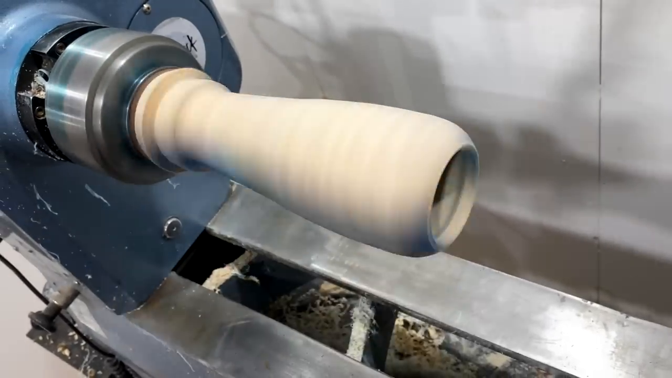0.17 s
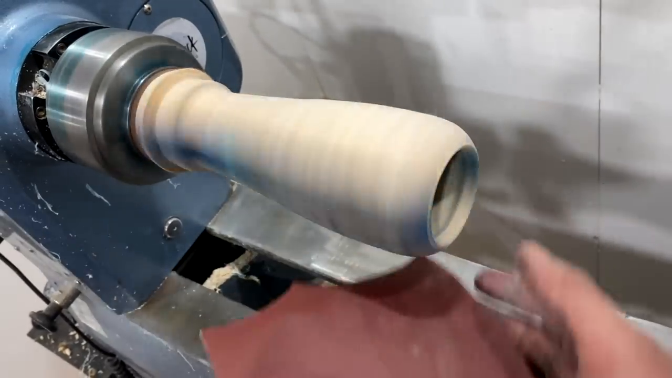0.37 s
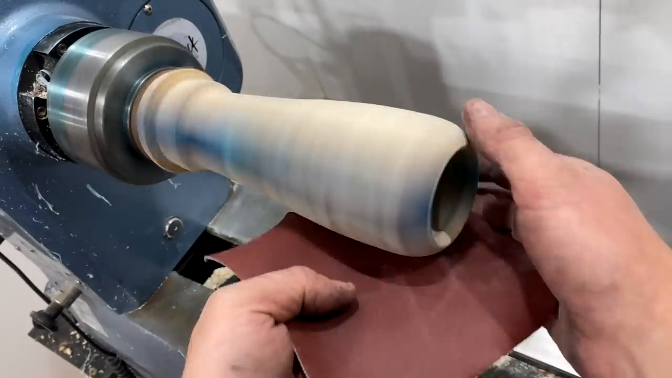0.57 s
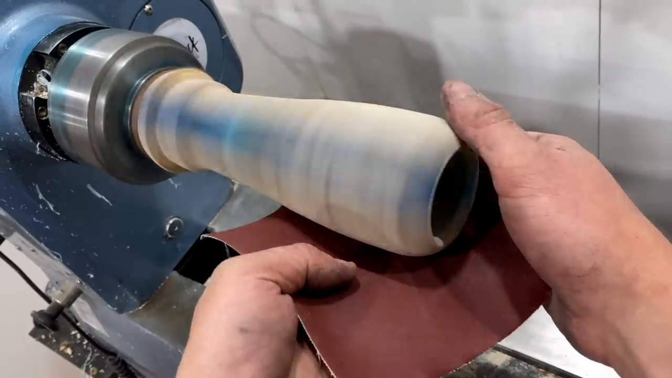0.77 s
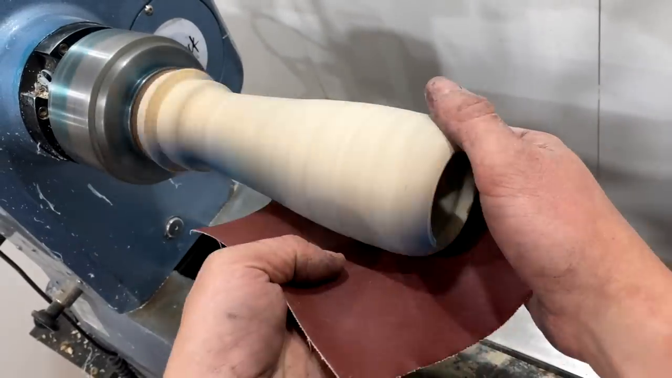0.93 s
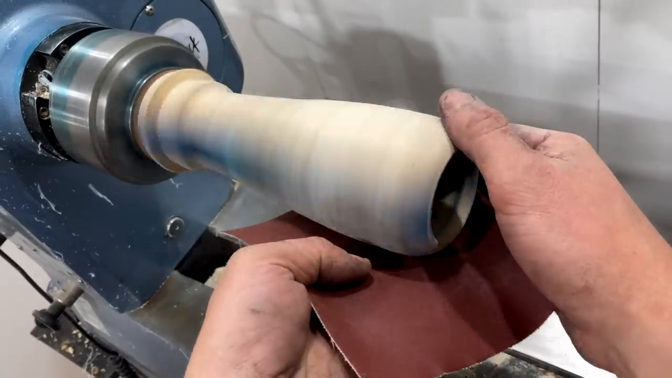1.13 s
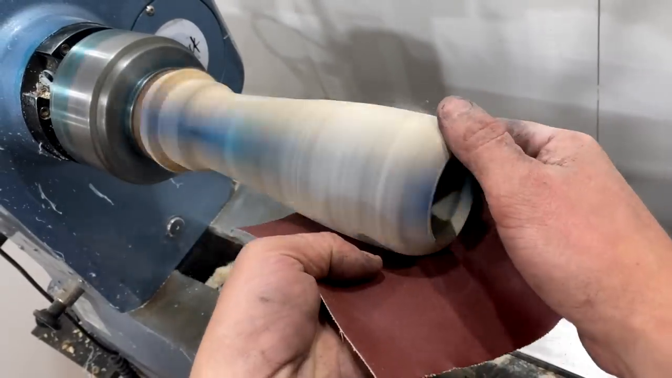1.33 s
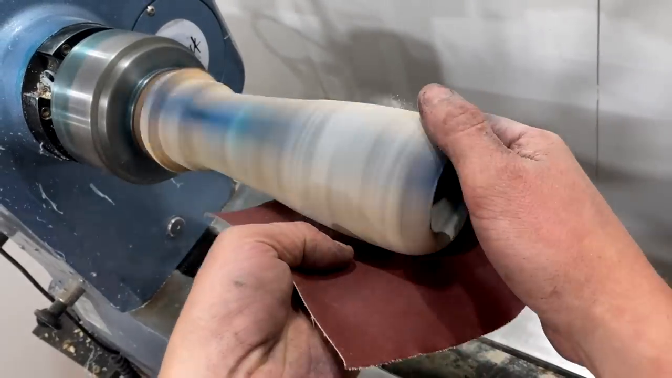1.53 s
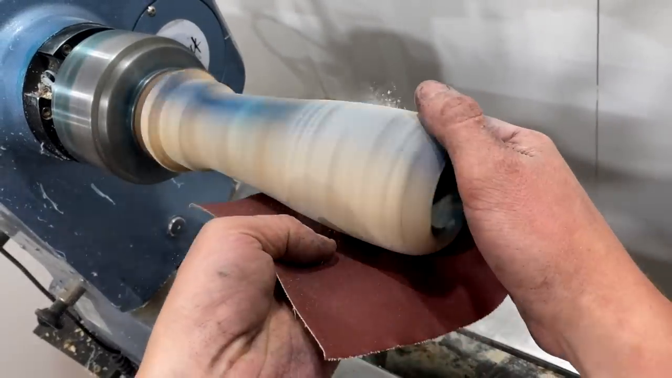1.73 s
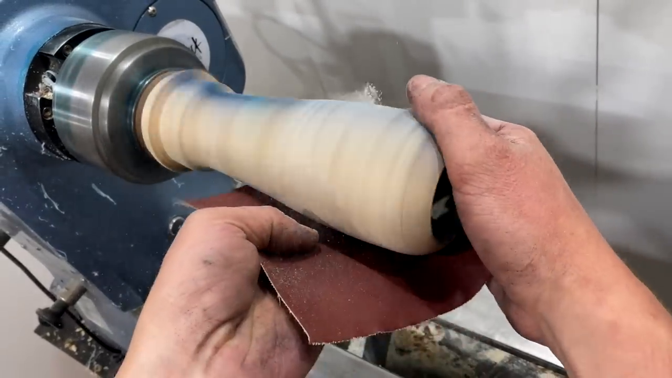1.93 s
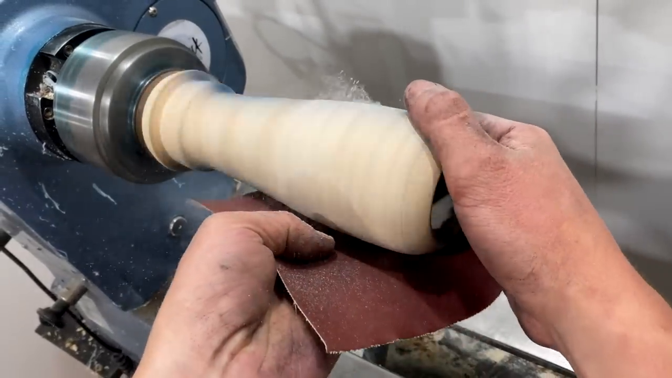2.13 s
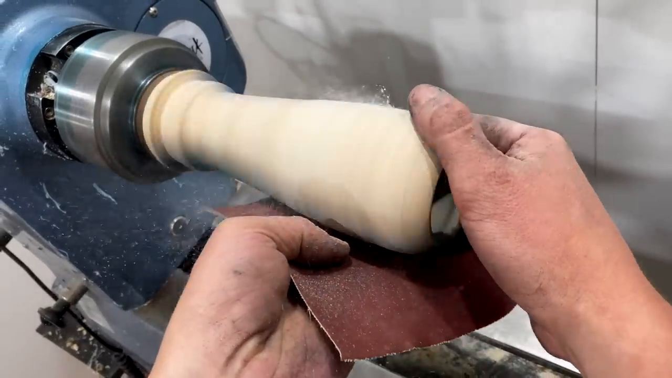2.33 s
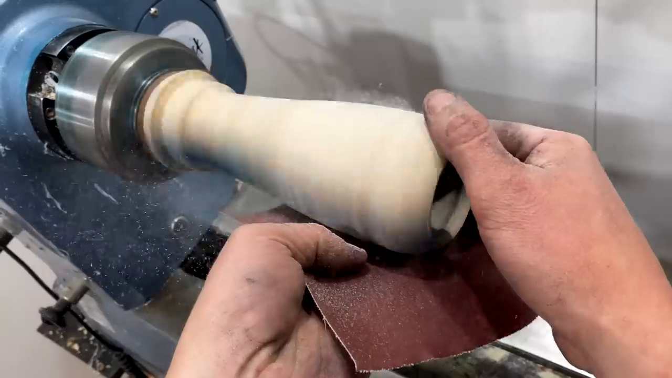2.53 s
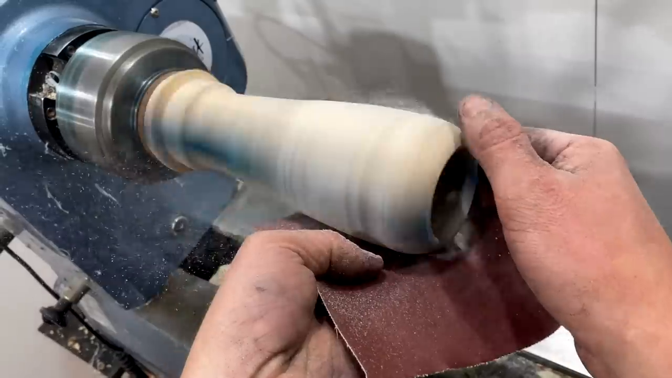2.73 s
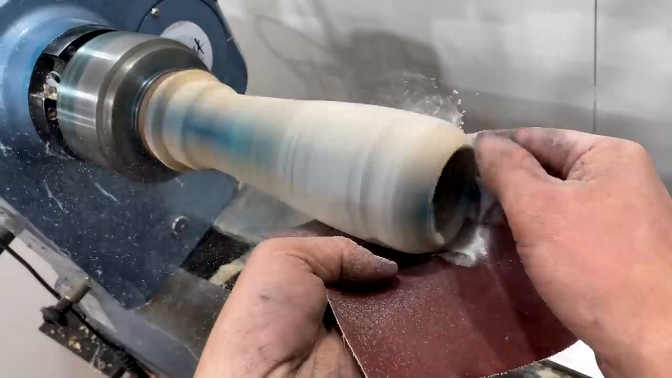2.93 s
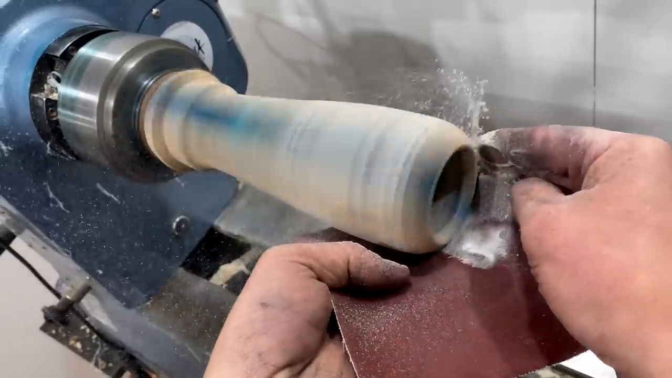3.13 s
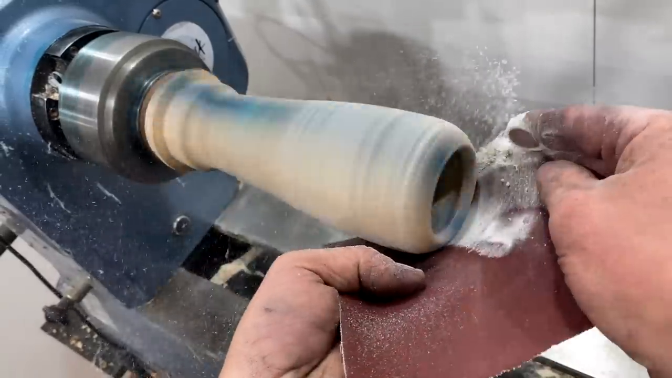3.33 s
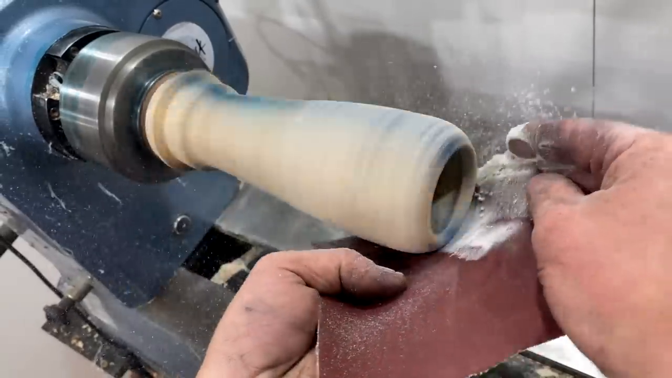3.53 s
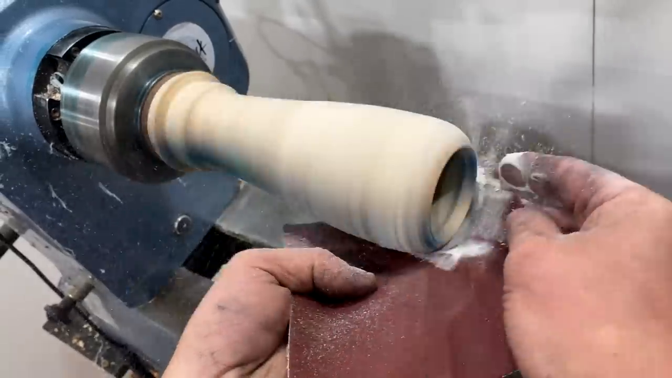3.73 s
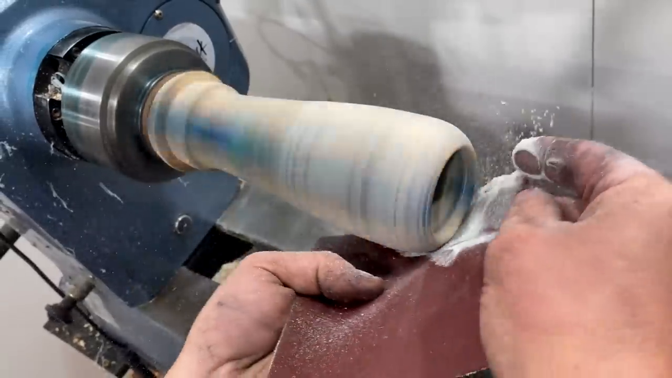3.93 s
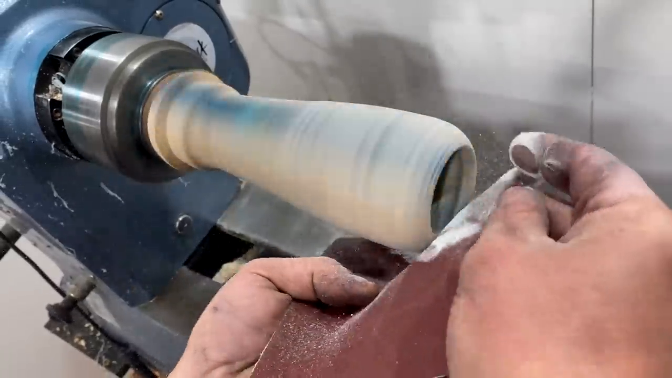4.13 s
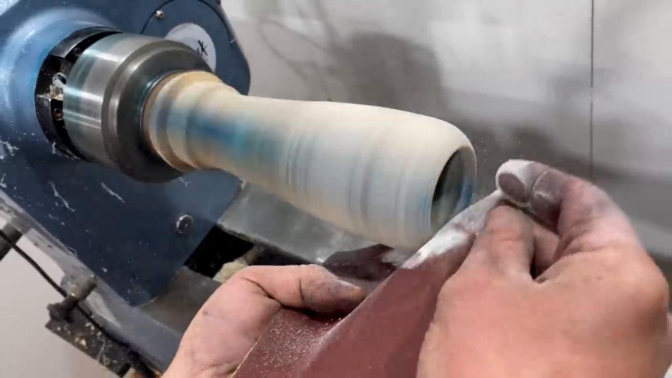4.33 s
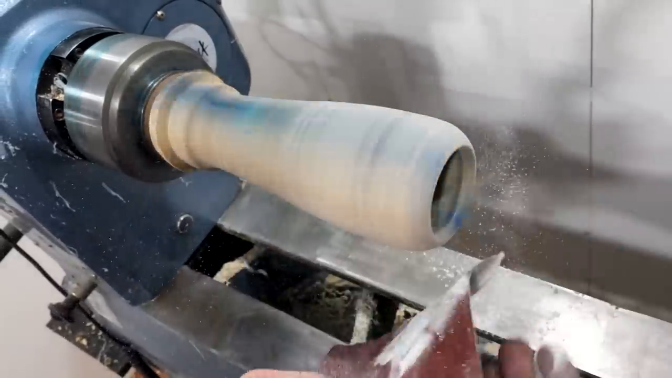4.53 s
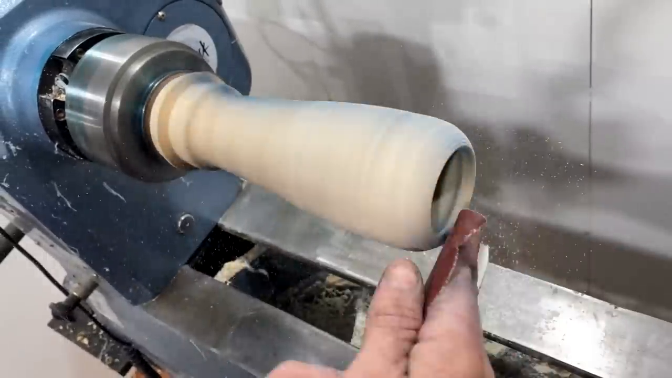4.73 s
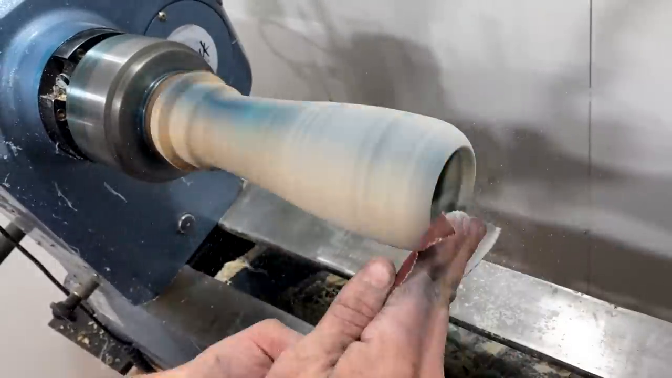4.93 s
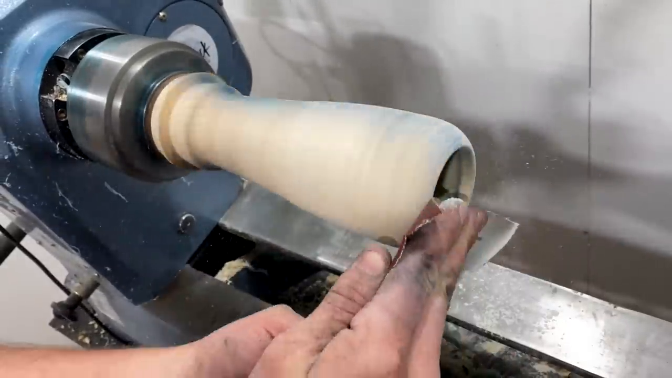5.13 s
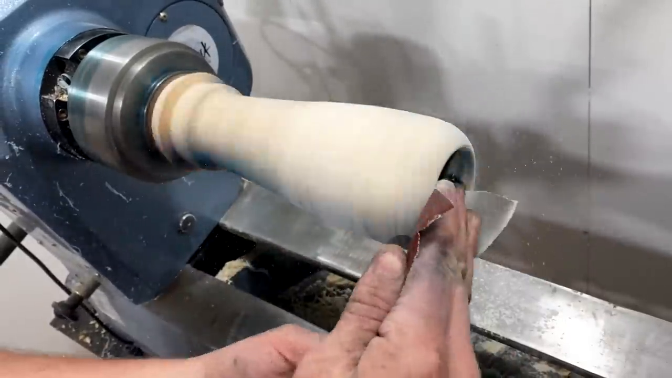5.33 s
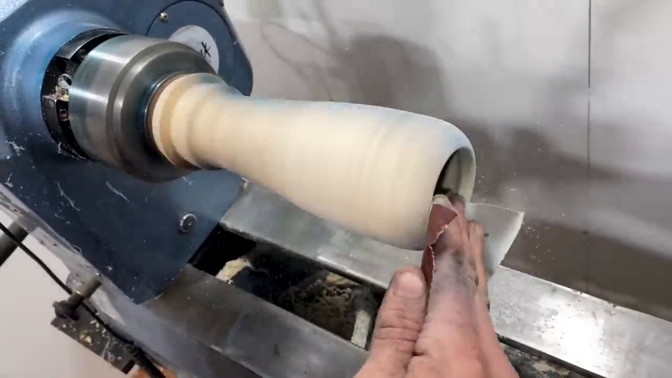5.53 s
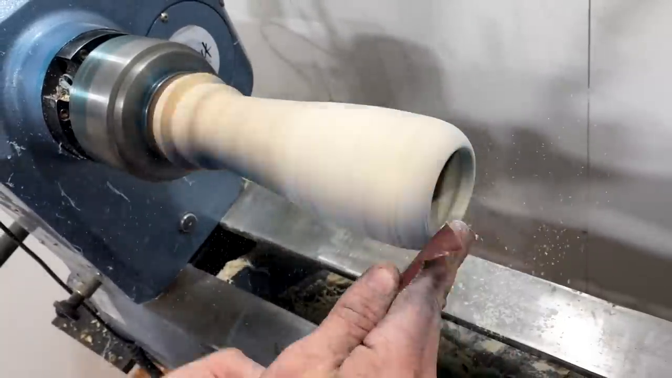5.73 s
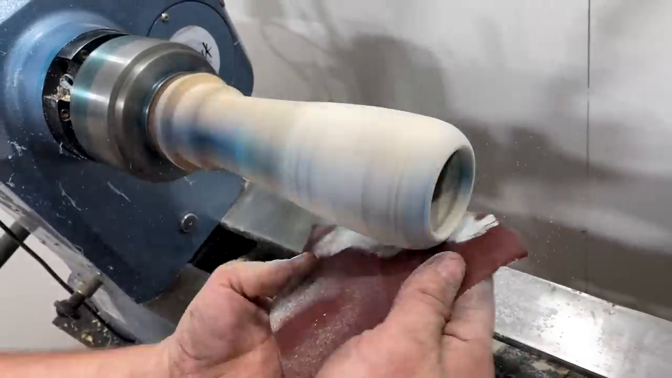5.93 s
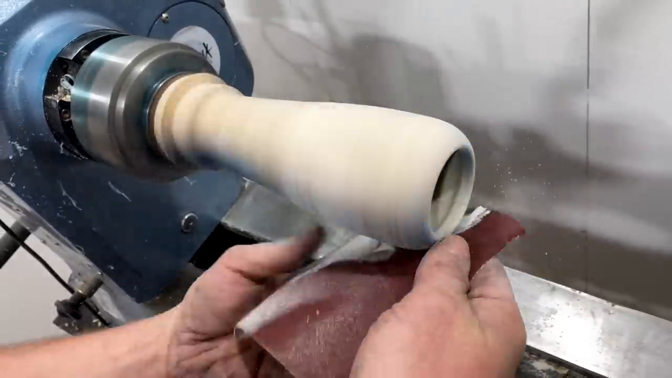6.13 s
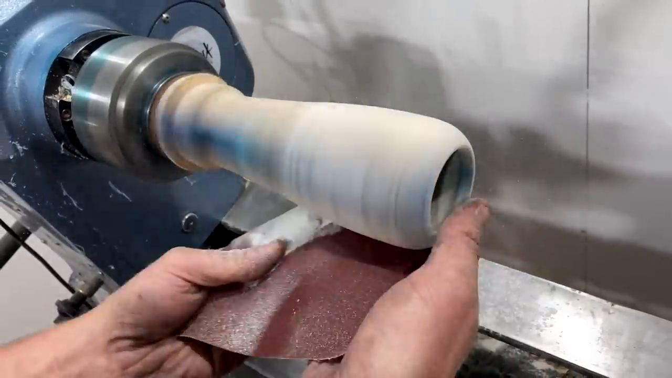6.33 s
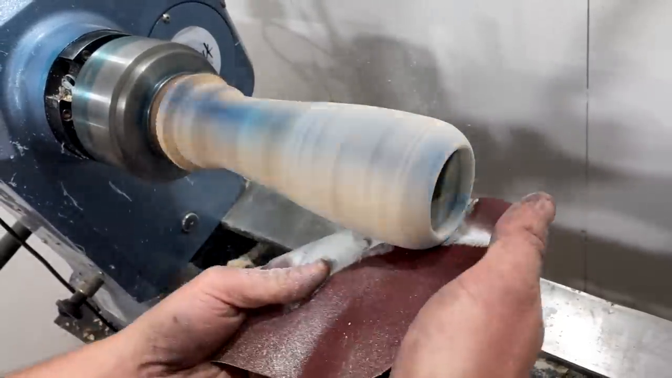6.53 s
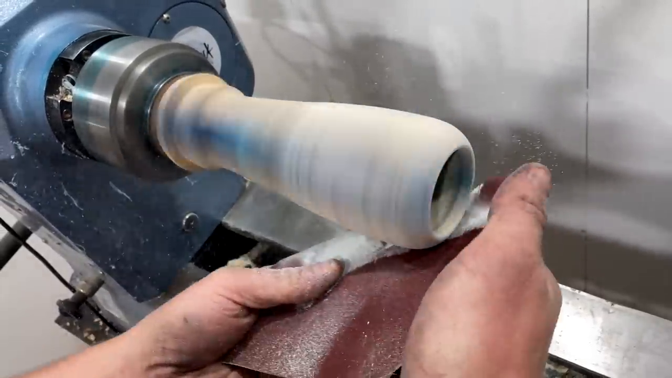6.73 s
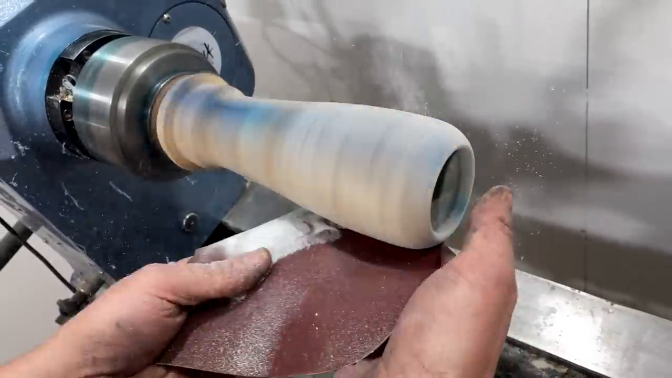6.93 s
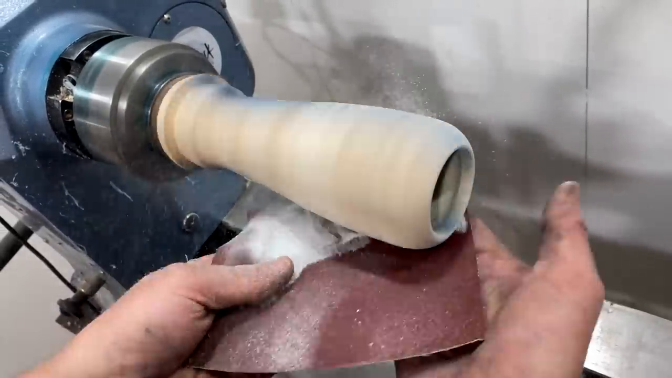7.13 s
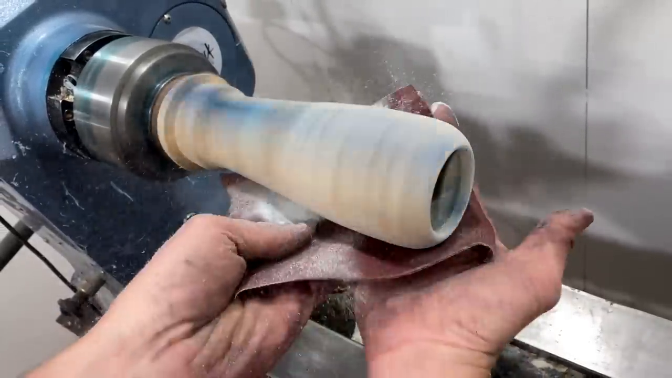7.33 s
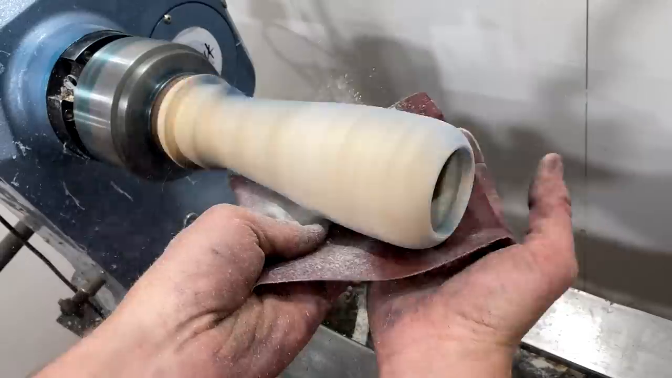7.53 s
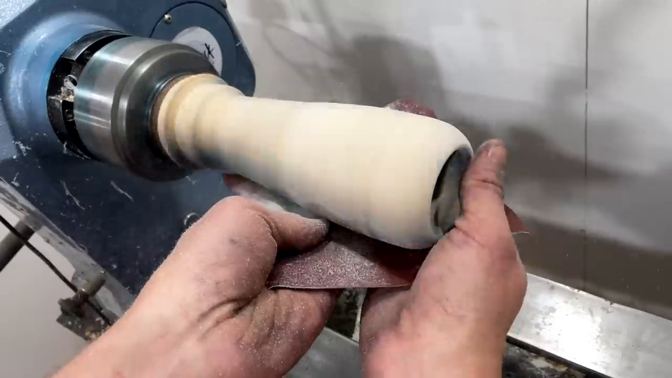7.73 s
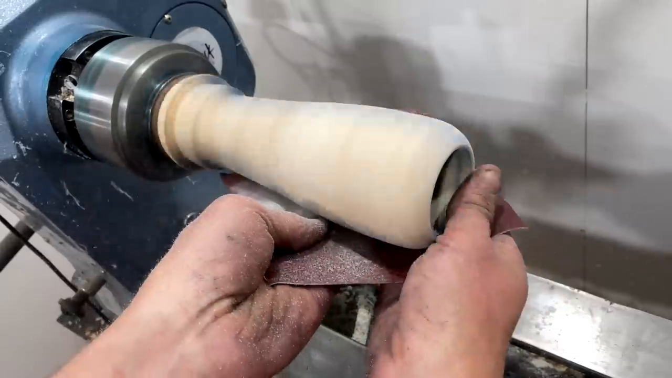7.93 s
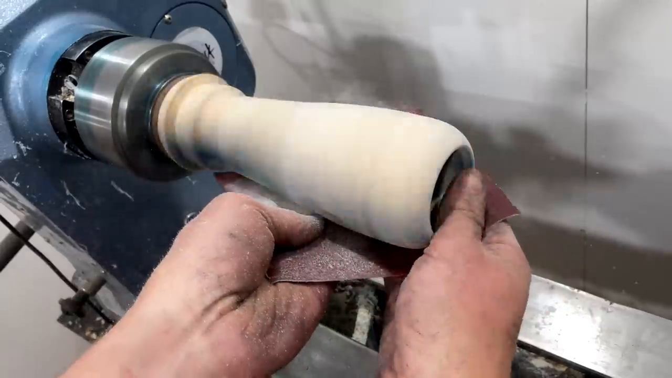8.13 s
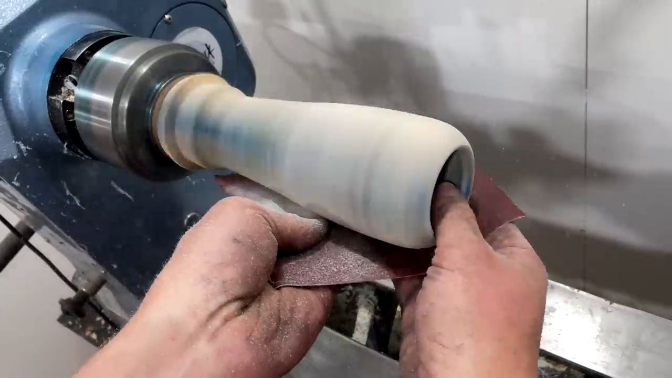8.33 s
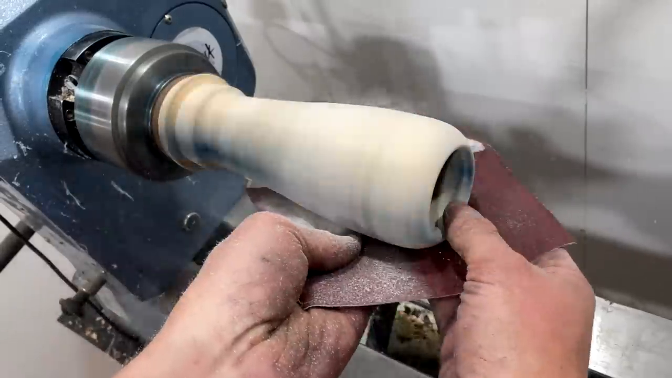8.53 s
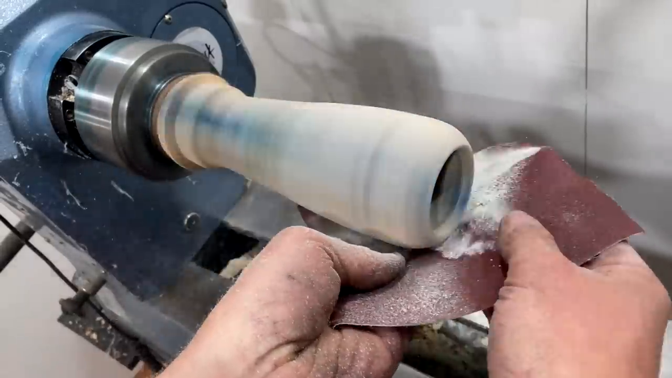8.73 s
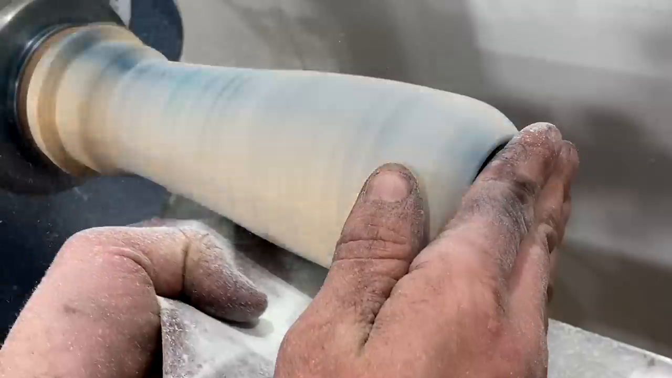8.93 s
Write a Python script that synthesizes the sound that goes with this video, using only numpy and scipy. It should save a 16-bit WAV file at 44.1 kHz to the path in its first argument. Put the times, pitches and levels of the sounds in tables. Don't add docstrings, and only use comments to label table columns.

```python
import sys
import numpy as np
from scipy import signal
from scipy.io import wavfile
from scipy.ndimage import uniform_filter1d

SR = 44100
rng = np.random.default_rng(int(sys.argv[2]) if len(sys.argv) > 2 else 0)


def how_loud(loudness_db):
    steps = np.asarray(loudness_db, float) / 20
    return 10 ** steps


def output_pcm(signal):
    pcm = np.clip(np.atleast_2d(signal).T, -1, 1) * 32767
    wavfile.write(sys.argv[1], SR, np.round(pcm).astype(np.int16))


N = 395577
TURNS_PER_S = 19.69
STEP = 32


def evened(x):
    return x / np.sqrt(np.mean(x ** 2) + 1e-20)


def read(points, hz):
    f, value = np.transpose(points)
    return np.interp(np.log(hz + 1), np.log(f + 1), value)


def follow(rows, t):
    s, *columns = np.transpose(rows)
    return [np.interp(t, s, c) for c in columns]


def at_samples(t, values):
    return np.interp(np.arange(N) / SR, t, values)


def drift(per_s):
    size = max(int(SR / STEP / per_s), 1)
    chance = rng.standard_normal(N // STEP + 2)
    return evened(uniform_filter1d(uniform_filter1d(chance, size), size))


def wander(per_s):
    coarse = drift(per_s)
    return np.interp(np.arange(N) / STEP, np.arange(len(coarse)), coarse)


def wander_at(t, *parts):
    return np.interp(t * SR, np.arange(N), sum(strength * wander(per_s) for strength, per_s in parts))


def short_time_axes(size):
    return np.fft.rfftfreq(size, 1 / SR), np.arange(4 * N // size + 5) * size / 4 / SR


def patches(t, hz, frames, bins):
    chance = rng.standard_normal((len(t), len(hz)))
    return evened(uniform_filter1d(uniform_filter1d(chance, frames, 0), bins, 1))


def ports(field_db, same, left_db=0, lead=0):
    a, b, c, d = np.moveaxis(rng.standard_normal(field_db.shape + (4,)), -1, 0)
    same = np.clip(same, -1, 1)
    left = a + 1j * b
    mixed = same * left + np.sqrt(1 - same ** 2) * (c + 1j * d)
    right = mixed * np.exp(-1j * lead) * how_loud(-left_db)
    z = np.array([left, right]) * how_loud(field_db)
    size = 2 * (field_db.shape[1] - 1)
    return signal.istft(z, nperseg=size, noverlap=3 * size // 4, time_axis=1, freq_axis=2)[1][:, :N]


def tone(hz, wander_hz, flutter_db, lead=0.47, per_s=26, crest_s=None):
    pitch = hz + np.repeat(wander_hz * drift(per_s), STEP)[:N]
    cycles = np.cumsum(pitch) / SR + rng.random()
    if crest_s is not None:
        cycles = cycles - cycles[round(crest_s * SR)]
    turn = (2 * np.pi * (cycles - np.floor(cycles))).astype(np.float32)
    strength = np.sqrt(2) * np.repeat(how_loud(flutter_db * drift(per_s)), STEP)[:N]
    return strength * np.array([np.cos(turn), np.cos(turn + np.float32(lead))])


# (time [s], openness [dB], inverter top tone [dB], bed drone [dB])
EXPOSURE = [(0, 5.5, -56.5, -37.5), (.2, 5, -54, -32.5), (.45, 6.5, -64, -30.5), (.7, 0.5, -66, -44.5),
            (1.25, -3, -74, -42), (2, -1, -59.5, -46), (3.1, -6, -65, -49.5), (3.6, -7, -68, -52.5),
            (4.2, -0.5, -58, -47), (4.6, -2.5, -49, -34.5), (4.85, 2, -52, -39.5), (5.3, 5, -51, -45),
            (6.0, 4, -53, -41), (6.7, 5, -50, -42.5), (7.15, 4.5, -65, -38), (7.6, 3, -55, -39),
            (8.3, -0.5, -68, -42.5), (8.97, -2, -58, -63)]


def machine(t):
    return follow(EXPOSURE, t)


# (frequency [Hz], density [dB per Hz])
WASH = [(260, -46), (450, -2), (690, -11), (900, -6.5), (1600, -10.5), (2180, -12.5), (2300, -5.5),
        (2420, -14.5), (6000, -25.5), (9000, -17), (9600, -17), (10100, -9), (10800, -20), (11100, -38),
        (15700, -42)]


def shop():
    hz, t = short_time_axes(1024)
    texture_db = 1.5 * patches(t, hz, 14, 10)
    level_db = 0.58 * machine(t)[0] + 1.1
    shade_db = 0.51 * np.minimum(cupping(hz, t), 0)
    same = read([(500, 0.1), (1000, 0.56), (6000, 0.5), (8000, 0.77)], hz)
    low_lead = read([(400, 0.18), (800, 4.2), (1500, 1.05)], hz)
    lead = np.where(hz < 1500, low_lead, read(GRIT_LEAD, hz))
    field_db = read(WASH, hz) + shade_db + texture_db + level_db[:, None]
    return how_loud(-49.5) * evened(ports(field_db, same, 0, lead))


# (time [s], motor hum [dB], sixth shaft order [dB], other orders [dB], shake wobble [Hz])
STRAIN = [(0, -58, -45.5, -8, 0.18), (.5, -52, -53.5, -8, .2), (1.0, -47, -56, -3, .2),
          (1.9, -48.5, -58, 2, .2), (2.2, -52, -46, 5, .2), (2.7, -52, -44, -4, .2), (3.5, -52, -47, 3, .2),
          (3.8, -48, -62, -8, .2), (4.3, -45, -60, -8, .2), (4.7, -49, -54, -8, .2),
          (5.2, -44, -62, -8, .2), (5.9, -47, -51, -7, 0.19), (6.3, -43.5, -54, -4, 4.1),
          (7.0, -45.5, -57, -5, 4), (7.5, -44, -65, -5, 2.8), (7.8, -43.5, -63, -5, 0.29),
          (8.4, -46, -65, -9, 0.31), (8.97, -47.5, -61, -6, 2.2)]


def spindle(t):
    return follow(STRAIN, t)


# (frequency [Hz], density [dB per Hz])
BED_NOISE = [(15, -52), (25, -19), (50, -14), (90, -10), (140, -9), (190, -5), (250, 0), (300, -8.5),
             (340, -15), (500, -23.5), (575, -24.5), (640, -51), (760, -62), (1500, -90)]
# (multiple of the turn [1], level over rumble [dB])
SHAFT_ORDERS = [(5, -19), (10, -12.5), (13, -10)]
# (time [s], frequency [Hz], level over rumble [dB])
HEADSTOCK_NOTE = [(0, 274, -24), (.9, 275.5, -6), (1.75, 274.6, -2.5), (2.02, 273.2, -6), (2.3, 273.8, -5),
                  (3.35, 274, 0.5), (3.6, 280, -9), (4.4, 285, -9), (5.6, 282.9, -9.5), (6.3, 279.8, -11.5),
                  (7.45, 286.5, -6), (8.97, 282.5, -7)]


def bed_rumble():
    now = np.arange(N) / SR
    open_db = machine(now)[0]
    hz, t = short_time_axes(4096)
    loaded_db = np.outer(0.5 * (hand(t)[5] + 50), read([(60, 0.72), (80, 0.6), (105, 0.16)], hz))
    bed = how_loud(1.5) * evened(ports(read(BED_NOISE, hz) + loaded_db, 0.97, -0.3))
    orders = sum(how_loud(db) * tone(k * TURNS_PER_S, 0.37, 0.92) for k, db in SHAFT_ORDERS)
    bed += how_loud(spindle(now)[2]) * orders
    head_hz, head_db = follow(HEADSTOCK_NOTE, now)
    bed += how_loud(head_db) * tone(head_hz, 2.2, 1.95, per_s=13)
    bed += how_loud(-26 + 0.85 * open_db) * tone(29 * TURNS_PER_S, 5.94, 2.7)
    return how_loud(-44 + 0.51 * open_db) * bed


def load_levels():
    t = short_time_axes(1024)[1]
    return [at_samples(t, db) for db in uniform_filter1d(hand(t)[5:], size=14)]


# (multiple of the turn [1], level over chatter [dB])
CHATTER_ORDERS = [(17, -11.5), (18, -4.5), (19, -7.5), (20, -8), (21, -2), (27, -26)]
# (time [s], level [dB])
GRIT_BITE = [(.68, -16), (.8, 2), (1.3, -4.5), (1.7, -8.5), (1.95, 1), (2.1, -5), (2.3, 0.5), (2.95, -3.5),
             (3.15, -6.5), (6, -16), (7, -16), (8.97, -17)]


def chatter(level_db):
    lines = sum(how_loud(db) * tone(k * TURNS_PER_S, 1.19, 3.8, per_s=7.9) for k, db in CHATTER_ORDERS)
    bite_db = follow(GRIT_BITE, np.arange(N) / SR)[0]
    return how_loud(level_db) * how_loud(bite_db) * lines


def shake(level_db):
    wobble_hz = spindle(np.arange(N) / SR)[3]
    strength = how_loud(level_db - 1.7 + 0.73 * wander(4.6))
    return strength * tone(4 * TURNS_PER_S + wobble_hz * wander(5.1), 0.26, 1.4, per_s=8.6)


# (time [s], level over rest [dB])
SWELLS = [(1.22, 2), (3.42, 10), (3.72, 4), (4.29, 5.5), (4.55, -7), (4.86, 3), (5.27, 10), (5.6, 9),
          (6.2, 0.5), (6.64, 6), (6.85, 5.5), (7.12, 5), (7.42, 4), (8.77, 15)]


def drone():
    t = short_time_axes(1024)[1]
    swell_db = at_samples(t, sum(db * np.exp(-((t - s) / 0.1) ** 2) for s, db in SWELLS))
    drone_db = machine(np.arange(N) / SR)[2]
    return how_loud(drone_db - 3.0 + swell_db) * tone(11 * TURNS_PER_S, 0.63, 0.81)


def motor_hum():
    hum_db, sixth_db = spindle(np.arange(N) / SR)[:2]
    beat_s = 3.42
    hum = how_loud(hum_db) * tone(114.05, 0.31, 1.2, per_s=15.5, crest_s=beat_s)
    sixth = how_loud(sixth_db) * tone(6 * TURNS_PER_S - .08, 0.31, 1.1, per_s=15, crest_s=beat_s)
    return hum + sixth


def lathe():
    shake_db, chatter_db = load_levels()
    return bed_rumble() + chatter(chatter_db) + shake(shake_db) + drone() + motor_hum()


# (time [s], frequency [Hz])
SLOT_HZ = [
    [(4.9, 840), (4.93, 828), (5.3, 832), (5.65, 839)],
    [(3.8, 866), (3.9, 862), (5.0, 866), (5.5, 877), (6.2, 885), (6.9, 888)],
]
# (time [s], level [dB])
SLOT_DB = [
    [(.35, -51), (.55, -64), (3.1, -58.5), (3.4, -72), (4.9, -70), (5.1, -59), (5.9, -51), (7.3, -56.5),
     (7.55, -66)],
    [(0, -65), (.3, -54), (.7, -64), (3.7, -73), (4.0, -59), (4.6, -55.5), (5.0, -62), (5.45, -59),
     (5.7, -67), (6.7, -56), (7.1, -66)],
]
# (frequency [Hz], level over cluster [dB], later change [dB], phase between ports [rad])
CLUSTER = [(9281, -6, -6, 2.0), (9760, -18, 6, 2.0), (9857, -3, -12, 2.0), (9954, 3, -3, 1.5),
           (10142, -7, 3, 1.0), (10239, -16, 0, 1.0), (10524, -15, 0, .5), (10815, -11, -8, 0),
           (10912, -12, -8, 0), (11380, -20, -4, 0)]
# (start [s], end [s])
REBALANCE = (1, 4)


def whine():
    t = np.arange(N) / SR
    open_db, top_db, _ = machine(t)
    slots = cluster = 0
    for pitch, level in zip(SLOT_HZ, SLOT_DB):
        slots = slots + how_loud(follow(level, t)[0]) * tone(follow(pitch, t)[0], 1.17, 0.82, 1.98)
    for f, db, change_db, lead in CLUSTER:
        strength = np.interp(t, REBALANCE, how_loud(np.array([db, db + change_db])))
        cluster = cluster + strength * tone(f, 2.5, 2.0, lead)
    top = how_loud(top_db) * tone(10719, 3.1, 0.9, 0)
    return slots + how_loud(-54 + 0.47 * open_db) * cluster + top


# (frequency [Hz], wander [Hz], level running free [dB], change with the sheet on the wood [dB])
BEARING_LINE = (2312, 3.5, -56, -8)


def bearing():
    hz, wander_hz, db, loaded_db = BEARING_LINE
    t = short_time_axes(1024)[1]
    touching = uniform_filter1d(1. * (hand(t - .15)[0] > -50), size=24)
    warming_db = -1 * t
    level_db = db + warming_db + loaded_db * touching + 0.47 * machine(t)[0]
    return how_loud(at_samples(t, level_db)) * tone(hz, wander_hz, 0.94, 1.74)


# (start [s], length [s], start frequency [Hz], end frequency [Hz])
EDGE_SONG = (5.27, .32, 415, 440)


def squeak():
    s, length, from_hz, to_hz = EDGE_SONG
    u = np.clip((np.arange(N) / SR - s) / length, 0, 1)
    pitch = from_hz + (to_hz - from_hz) * np.minimum(u / .4, 1)
    return how_loud(-53.5) * np.sin(np.pi * u) * tone(pitch, 4.2, 2.5)


# (time [s], peak level [dB], frequency [Hz])
SCUFFS = [(0.473, -30, 417), (0.54, -37, 900), (0.655, -32.5, 450), (4.12, -48, 409), (4.759, -34, 698),
          (5.328, -35, 416), (5.92, -45, 842), (7.114, -41, 445), (8.028, -38, 415), (0.08, -36, 130),
          (0.46, -43, 130), (5.83, -41, 55), (5.905, -44, 1300), (5.455, -42, 1400), (6.26, -38, 90),
          (6.86, -39, 90), (7.1, -38, 110), (7.37, -40, 3000), (0.67, -38, 85), (4.08, -43, 90)]


def knocks():
    out, t = np.zeros((2, N + SR)), np.arange(SR // 8) / SR
    for s, db, hz in SCUFFS:
        band = signal.butter(1, [hz * 0.29, hz * 1.5], "bandpass", fs=SR, output="sos")
        scuff = evened(signal.sosfilt(band, rng.standard_normal((2, len(t)))))
        envelope = how_loud(db - 8.5 - 60 * t / 0.17) * np.minimum(t / 0.001, 1)
        out[:, round(s * SR):][:, :len(t)] += envelope * (scuff + 0.45 * scuff[::-1])
    return out[:, :N]


# (time [s], pressure [dB], wrap of the sheet round the wood [dB])
PALM_STROKES = [
    [(0.37, -60, 9), (0.38, -28.5, 1), (0.44, -22.5, -5), (0.53, -24, -1.5), (0.68, -27.5, 1),
     (0.9, -28.5, 1), (1.25, -25.5, -3), (1.47, -28.5, 0.5), (1.64, -29.5, 0.5)],
    [(1.64, -31, 1), (1.9, -26.5, 0.5), (2.1, -31, 1.5), (2.35, -28, -.5), (2.6, -29.5, -1),
     (2.8, -30, -0.5), (3.0, -28.5, -2), (3.25, -32, -2), (3.4, -37.5, 0)],
    [(3.4, -35.5, -4), (3.5, -37.5, -1), (3.6, -32, -2.5), (3.78, -36, -3), (3.92, -42, 0.5),
     (4.06, -40.5, 2.5), (4.16, -45.5, 4), (4.44, -45, 2.5), (4.465, -52, 5)],
]
FOLD_STROKES = [
    [(4.465, -69, 6.3), (4.6, -63.5, 11.5), (4.713, -66, 9.4)],
    [(4.714, -41, 3), (4.72, -40, -2.5), (4.764, -44, 5.5), (4.83, -37, 1), (4.92, -44.5, 4.5),
     (5.0, -36.5, 1), (5.06, -47, 7)],
    [(5.06, -44, 5.5), (5.12, -43.5, 5.5), (5.16, -37, 1), (5.244, -43.5, 2), (5.294, -37, 4),
     (5.41, -43.5, 2.5)],
    [(5.41, -41.5, 1.25), (5.6, -41, 3), (5.65, -44, 6.8), (5.8, -44, 2.2)],
    [(5.8, -46, 4.5), (5.918, -35, -2), (6.0, -36, -1), (6.12, -36.5, 0)],
]
CRADLE_STROKES = [
    [(6.12, -34, 0.5), (6.33, -34.5, 4), (6.4, -30.5, 0), (6.52, -34.5, 0.5), (6.7, -36, 0.5),
     (6.75, -33.5, 0), (7.0, -33.5, 1.5), (7.1, -34, -3), (7.14, -36, 3)],
    [(7.14, -38, 6), (7.21, -27, -1.5), (7.24, -35.5, 7), (7.29, -25, -1), (7.41, -28.5, 2.5),
     (7.57, -28.5, 1), (7.72, -31.5, 0.5), (7.9, -30, 1), (8.1, -28, -1)],
    [(8.1, -29.5, 0.71), (8.31, -29.5, 0.17), (8.45, -33, 1.4), (8.56, -30, -0.058), (8.64, -32, 1.7),
     (8.73, -31.5, -1.2), (8.8, -35.5, -0.44), (8.87, -34, 1.6), (8.97, -32.5, -1)],
]
# (wood scrape [dB], hollow end ring [dB], throb depth [dB],
# bed shake [dB], chatter [dB])
MANNERS = [(-1, -0.5, 7, -47, -49.5), (-1.5, 2, 2.5, -49.5, -54), (2.5, 3, 1.5, -55.5, -57),
           (10, 0, 3, -65, -73), (3.5, 13, 2.5, -66, -66), (2, 5, 0, -85, -66), (4.5, 1, -5, -70, -72),
           (3.5, 4, 1, -58, -70), (2, -11, 2, -45.5, -51), (1, -5, 1, -44.5, -52), (1.5, -4, 2, -48, -47)]
# (shake [dB], chatter [dB])
LIFTED = (-65, -66)


def hand(t):
    out = np.outer([-120, 0, 0, 0, 0, *LIFTED], np.ones(len(t)))
    strokes = PALM_STROKES + FOLD_STROKES + CRADLE_STROKES
    for rows, (scrape_db, ring_db, throb_db, shake_db, chatter_db) in zip(strokes, MANNERS):
        on = (t >= rows[0][0]) & (t <= rows[-1][0] + .004)
        press_db, wrap_db = follow(rows, t[on])
        extra_db = np.clip(press_db - np.median(press_db), -8, 8)
        out[:, on] = (press_db,
                      wrap_db,
                      scrape_db + wrap_db,
                      ring_db - 0.22 * extra_db,
                      np.full_like(wrap_db, throb_db),
                      shake_db + 0.67 * wrap_db + 1.4 * extra_db,
                      chatter_db + 0.22 * extra_db)
    return out


# (time [s], width [s], frequency [Hz], width [octaves], level [dB])
BENDS = [(1.51, 0.17, 1270, .2, 10.5), (2.32, 0.12, 1200, 0.1, 9), (2.17, .05, 1150, .15, 6),
         (2.5, .1, 1450, .1, -8), (3.66, 0.19, 4600, 0.24, 6), (4.1, 0.028, 1400, .25, 21),
         (4.8, 0.043, 4500, .3, 4), (5.7, .05, 1900, .3, 4), (5.63, 0.2, 3200, 0.15, -13),
         (6.4, .15, 6500, .3, -2), (6.3, 0.05, 3700, 0.25, 6), (6.44, .05, 3800, .3, 4),
         (6.19, .05, 4000, .25, 5), (6.95, 0.22, 4200, .3, 4), (7.14, 0.023, 5200, .7, -10),
         (2.75, .25, 3050, .08, -2), (5.4, 0.44, 1400, .1, 8), (7.145, 0.033, 2400, 0.63, -12),
         (7.4, 0.14, 3400, 0.11, 6), (7.39, 0.07, 2460, .15, 10), (7.56, .05, 2600, .12, 7),
         (1.15, 0.076, 4600, .06, 6), (1, .15, 3860, .12, 4.5), (1.86, 0.046, 6500, 0.18, 2.5),
         (1.82, 0.085, 6600, 0.14, 1.5), (3.2, 0.087, 4800, .1, 5), (3.8, 0.25, 6200, .12, -5),
         (4.25, .07, 5500, .1, 6), (5.45, .08, 4900, .1, 7), (5.76, 0.08, 2320, 0.057, 11),
         (5.7, 0.36, 6300, .12, -6), (5.9, 0.074, 5800, .1, 4), (6.1, 0.031, 5700, .3, -7),
         (8.66, 0.32, 6230, 0.083, -6), (8.5, 0.15, 3000, .15, 3), (0.92, .3, 2300, .12, -4),
         (2.21, 0.14, 1900, 0.13, 6), (2.47, 0.11, 1880, .05, 4.5), (1.81, 0.12, 1270, .25, -7),
         (5.1, 0.31, 2630, 0.079, 3)]


def cupping(hz, t):
    s, width, f, octaves, db = np.transpose(BENDS)
    in_time = np.exp(-((t[:, None] - s) / width) ** 2)
    in_pitch = np.exp(-(np.log2((hz[:, None] + 1) / f) / octaves) ** 2)
    return db * in_time @ in_pitch.T


# (frequency [Hz], density [dB per Hz])
GRIT_HISS = [(700, -25.5), (1000, -23.5), (1230, -12.5), (1480, -17.5), (1900, -7), (2150, -9.5),
             (2950, -5.5), (3500, -1), (5500, -4), (7500, 1.5), (8300, 6.5), (12300, 4), (14000, -2),
             (15700, -3.5)]
# (frequency [Hz], left over right [dB])
GRIT_BALANCE = [(500, -3), (1200, 2.5), (2000, 5), (3000, 7), (4100, 11.5), (5300, 4.5), (6500, 4),
                (7600, 3), (8000, 0)]
# (frequency [Hz], lead of the left [rad])
GRIT_LEAD = [(400, -.3), (1200, .5), (3300, 1.9), (5000, 1.0), (5800, 0), (7300, -1.7), (8000, -2.7),
             (8850, -3.45), (10350, -5.95), (11400, -6.6), (12850, -9.1), (14200, -9.7), (15200, -12.2),
             (15800, -12.6)]
# (frequency [Hz], likeness [1])
GRIT_COHERENCE = [(300, .9), (900, .5), (1200, .8), (1800, .62), (2300, .35), (3000, .62), (5000, .55),
                  (6000, .85), (7200, .7), (8000, .97), (8700, .95), (9500, .83), (11000, .97),
                  (12000, .85), (13000, .98), (14000, .96), (14700, .8)]
# (time [s], share of the shift [1])
EDGE_CENTRED = [(3.9, 0), (4.4, .6), (5.2, 1), (5.75, 1), (6.1, 0)]


def sandpaper():
    hz, t = short_time_axes(256)
    pressure_db, body_db, scrape_db, ring_db, throb_db = hand(t)[:5]
    scrape_shape = read([(1300, 0), (1600, .6), (2300, 1), (3000, 1), (3700, 0)], hz)
    body_shape = read([(2900, 0), (3400, 1), (6500, 1), (8500, 0)], hz)
    ring_shape = read([(1300, 0.67), (1600, 0.0051)], hz)
    shape_db = np.outer(scrape_db, scrape_shape) + np.outer(body_db, body_shape) + np.outer(ring_db, ring_shape)
    texture_db = 0.93 * patches(t, hz, 24, 2)

    turn = 2 * np.pi * TURNS_PER_S * t + wander_at(t, (0.91, 1.03))
    grain = np.cos(2 * turn + .5) + 0.5 * np.cos(4 * turn + 0.886)
    treble_share = read([(1500, 0.038), (5000, 0.46)], hz)
    throbbing_db = np.outer(np.clip(throb_db, 0, 4) * grain, treble_share)
    jitter_db = wander_at(t, (0.59, 6.4), (0.3, 42), (0.89, 200))
    level_db = uniform_filter1d(pressure_db, size=2) + jitter_db - 14.5
    field_db = read(GRIT_HISS, hz) + shape_db + cupping(hz, t) + throbbing_db + texture_db + level_db[:, None]

    swaying = 0.14 * wander_at(t, (1, 12.0))[:, None]
    centred = np.outer(follow(EDGE_CENTRED, t)[0], read([(2000, 0), (3000, 1), (4500, 1), (5800, 0)], hz))
    left_db = read(GRIT_BALANCE, hz) - 2.3 * centred
    lead = read(GRIT_LEAD, hz) + swaying - 0.51 * centred
    return ports(field_db, read(GRIT_COHERENCE, hz), left_db, lead)


def scene():
    return sandpaper() + lathe() + whine() + bearing() + shop() + knocks() + squeak()


# (from [Hz], to [Hz], bins per band [1], drop threshold under the partner [dB], scatter [dB])
THIN_BANDS = [(2400, 7000, 6, -10, 2), (7000, 10000, 9, -12, 4), (10000, 15700, 11, -8.5, 3.5)]


def thinned(x):
    shape = dict(window="cosine", nperseg=2048, noverlap=1024)
    hz, _, z = signal.stft(np.array([x[0] + x[1], x[0] - x[1]]) / 2, SR, **shape)
    keep = np.ones(z.shape)
    for from_hz, to_hz, size, under_db, scatter_db in THIN_BANDS:
        first, count = np.searchsorted(hz, from_hz), int((to_hz - from_hz) / hz[1] / size)
        bins = slice(first, first + count * size)
        power = (abs(z[:, bins]) ** 2).reshape(2, count, size, -1).sum(axis=2)
        threshold_db = under_db + scatter_db * rng.standard_normal(power.shape)
        audible = power > power[::-1] * how_loud(2 * threshold_db)
        keep[:, bins] = np.repeat(audible, size, axis=1)
    mid, side = signal.istft(z * keep, SR, **shape)[1][:, :N]
    return np.array([mid + side, mid - side])


def roll_off(x):
    return signal.sosfilt(signal.butter(12, 17110, fs=SR, output="sos"), x)


def record(dry):
    low_pass = signal.firwin(1023, 15780, window=("kaiser", 9), fs=SR)
    limited = signal.oaconvolve(dry, low_pass[None], "same")
    mix = thinned(limited)
    return roll_off(mix)


dry = scene()
out = record(dry)
output_pcm(out)
```